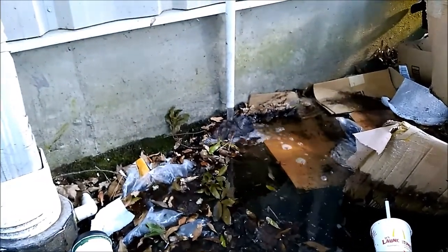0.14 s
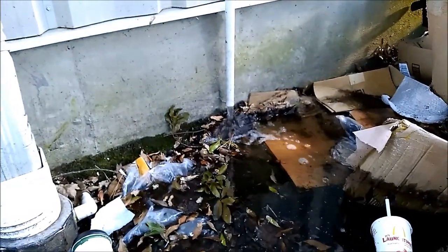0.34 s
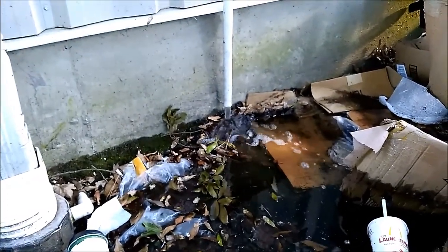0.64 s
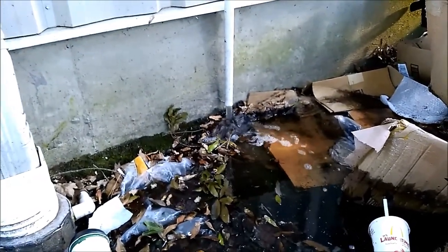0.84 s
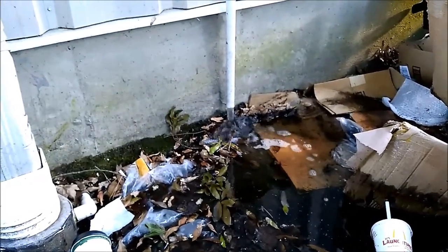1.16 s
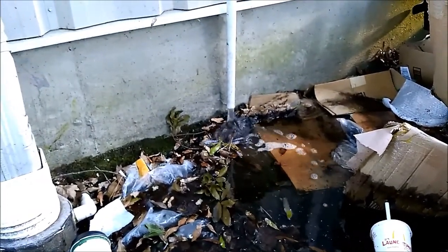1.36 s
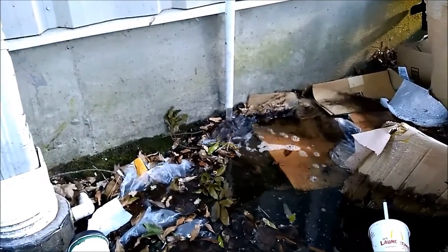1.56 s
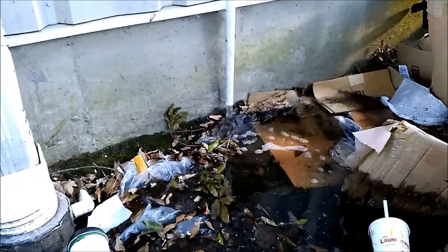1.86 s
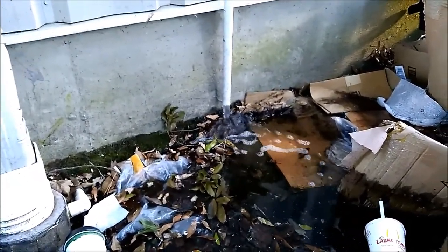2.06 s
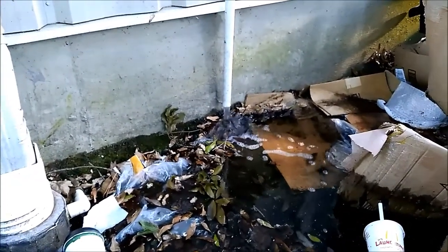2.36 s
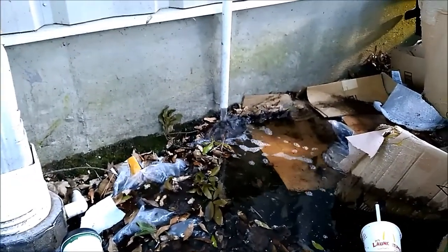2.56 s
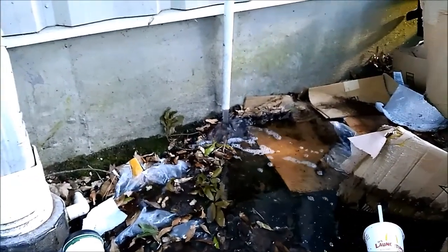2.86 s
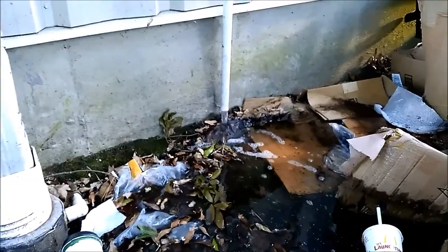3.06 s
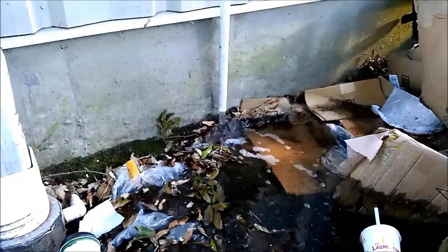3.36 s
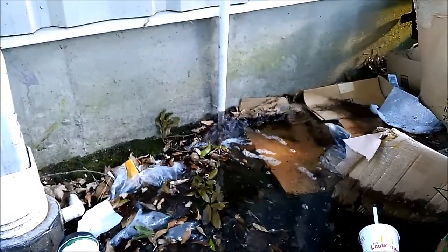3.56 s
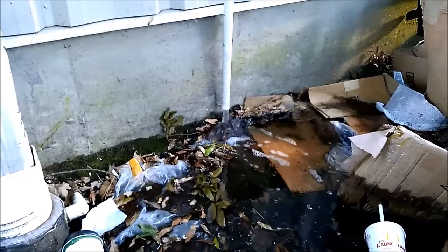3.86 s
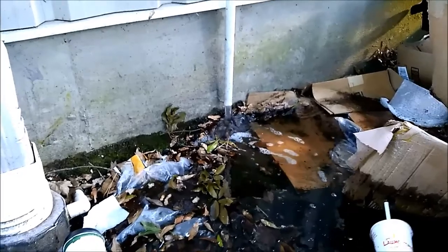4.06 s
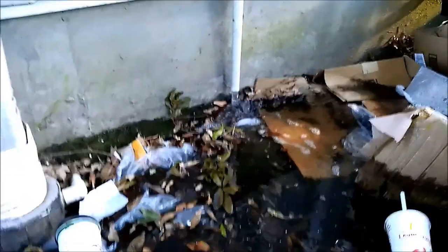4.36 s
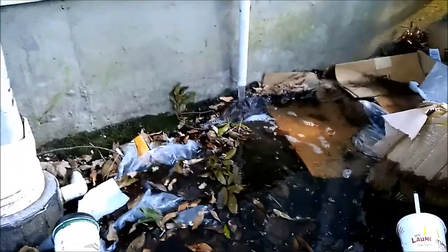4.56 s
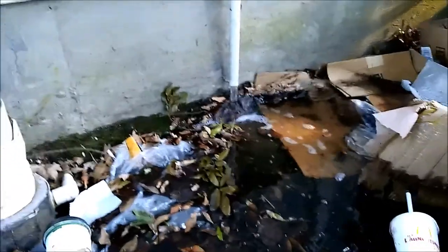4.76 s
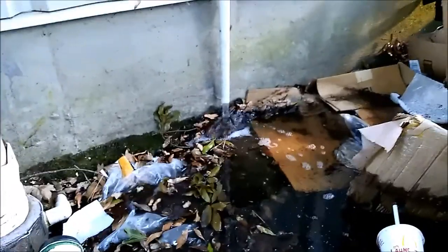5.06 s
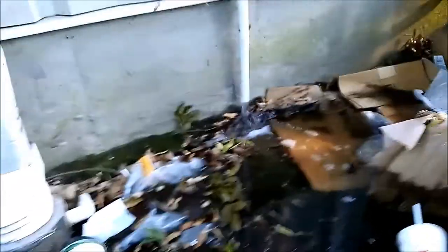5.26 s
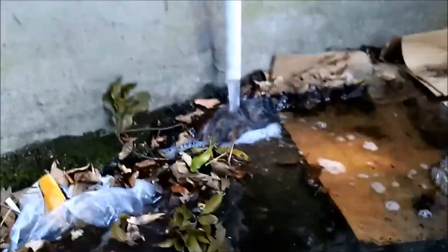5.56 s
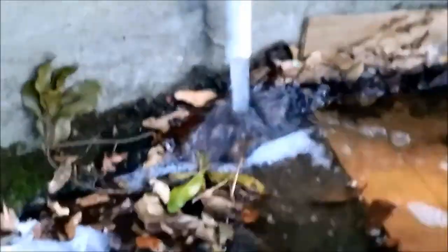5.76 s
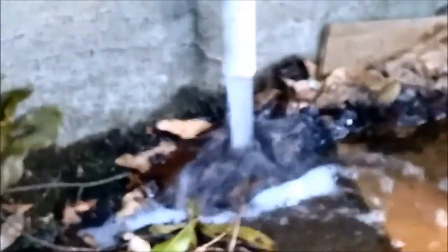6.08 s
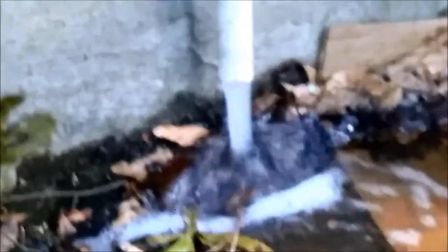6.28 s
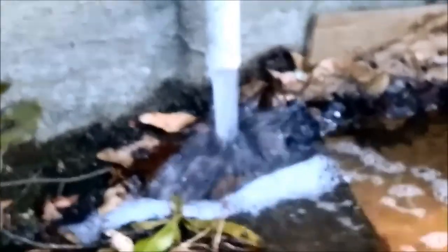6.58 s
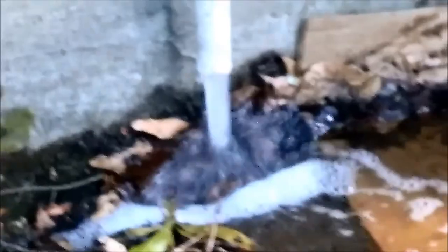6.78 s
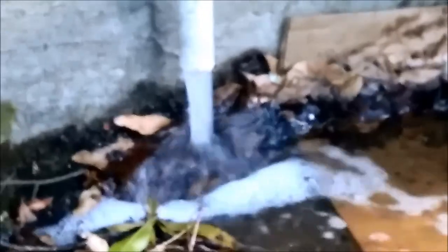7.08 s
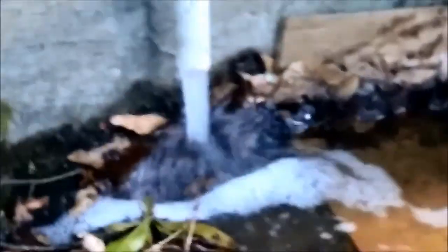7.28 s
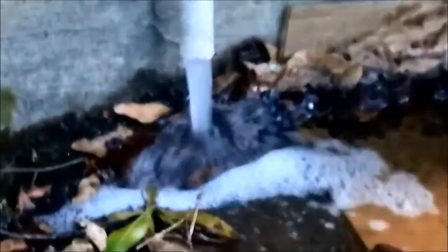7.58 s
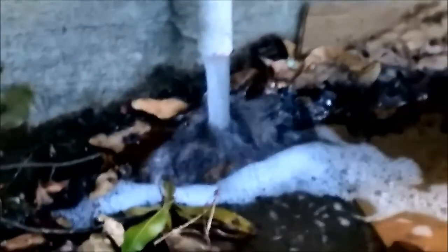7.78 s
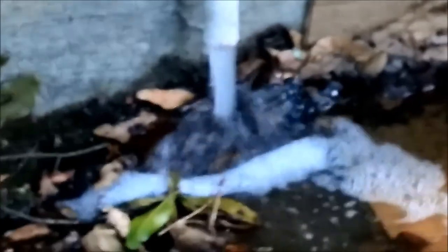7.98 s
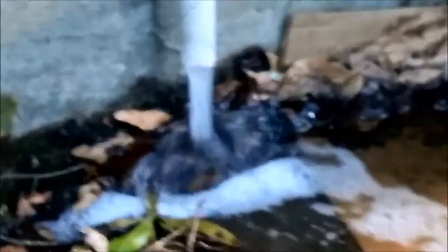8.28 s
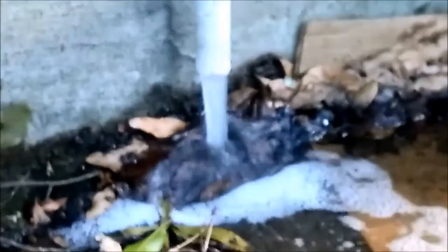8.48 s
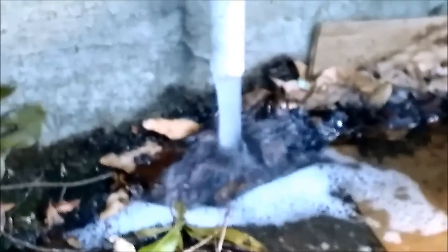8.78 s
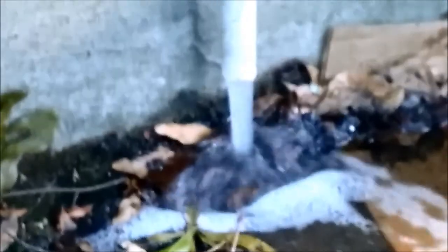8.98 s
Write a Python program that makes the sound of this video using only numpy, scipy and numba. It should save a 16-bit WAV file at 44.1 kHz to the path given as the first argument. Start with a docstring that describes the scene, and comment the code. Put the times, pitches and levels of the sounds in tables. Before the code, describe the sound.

Outdoors, water pours from a drain pipe into a puddle a few metres from a hand-held phone. It hisses in countless small splashes, bubbles, and ticks on wet leaves and cardboard over a low, uneven rumble. The hand bumps the phone softly a few times. Late on, one sharp knock hits the left microphone, and that side stays louder, with a bright hiss and a faint thin whistle.

```python
"""A puddle among wet leaves under a drain pipe, a few metres from a hand-held phone's two microphones.
The falling water hisses in countless small splashes, ticks on leaves and card, and rings as bubbles,
over a low rumble that the microphones hear in opposite phase. Close up, the hand bumps the phone.
One knock lands on the left microphone, which is louder and hisses brightly from then on."""
import sys
import numpy as np
from scipy import signal
from scipy.fft import rfft, irfft, next_fast_len
from scipy.io import wavfile
from scipy.ndimage import uniform_filter1d
from numba import njit

SR = 44100
rng = np.random.default_rng(int(sys.argv[2]) if len(sys.argv) > 2 else 0)


def wav_out(sig):
    """Save sig, one row per channel (or a flat mono array), as 16-bit PCM at SR to the path in sys.argv[1]."""
    wavfile.write(sys.argv[1], SR, np.round(np.clip(np.atleast_2d(sig).T, -1, 1) * 32767).astype(np.int16))


N = 402632
KNOCK_S = 7.1847
GURGLE, SPRAY = 2, 3  # rows of the flow

# centres of the four parts of the wash (rumble, rush, gurgle, spray): f/Hz
PART_HZ = [150, 900, 2600, 5600]
# slow swell of the flow: t/s, rumble/dB, rush/dB, gurgle/dB, spray/dB
FLOW = [(0, 3, 1, .5, -1), (.6, 4.5, 2, .5, -1.45), (1.15, 7.5, -1, 0, 2), (1.4, 4.5, 0.5, -1.5, 1),
        (1.85, 5.5, 1.5, .5, 0), (2.2, 0, -1.5, 2.5, -2), (2.62, 6.5, 1.5, 0, -1.5),
        (2.74, -6.5, -6, -3, -2), (3.1, 3.5, -1, 0, -2.5), (3.3, -4.5, -5, -1, -2),
        (3.5, -8, -11.5, -7.5, -2.5), (4.33, -8.5, -9, -6, -4), (4.7, -13.5, -9, -6, -3),
        (5.2, -1, -1.5, -4, -4.5), (5.5, -10.5, -7, -11, -3), (5.85, -9, -7, -8.5, -3),
        (6.0, -13.5, -6.5, -11.5, -4), (6.38, -10.5, -8, -12, -1.5), (6.5, -10.5, -1.5, -5.5, 0),
        (6.85, -1, -0.5, -1, -2), (7.1, -13, 0, -9, -2.5), (7.4, -7.5, -4.5, -9, -8),
        (8.25, -9.5, -3.5, -8, -8), (8.4, -0.5, -3.5, -7, -14), (8.6, -7, -3.5, -7, -10.5),
        (9.13, -5.5, -2, -7, -12)]
# gushes on top of the flow: t/s, length/s, rumble/dB, rush/dB, gurgle/dB, spray/dB
GUSHES = [(.8, .2, 3, -1, 2, 2), (2.421, .22, -6.5, -1, 0.5, 2), (3.781, .16, 2, 2, 7, 3),
          (3.931, .1, 4, 0, 6, 1), (4.03, .12, 4, 8.5, 4, 3.5), (4.419, .14, 6, 6, 10, 7),
          (4.53, .14, 8, 4.5, 9, 5), (4.899, .17, 3.5, -1.5, 10, 1.5), (5.07, .14, -10, -3.5, 4.5, 1),
          (5.28, .1, -2, -1.5, 5, 2), (5.69, .15, 4, 1, 7, 3), (7.521, .1, -7, 1, 4, 1.5),
          (8.13, .16, 8.5, 2, 5, 2), (8.78, .2, -4, -0.5, 4, 1)]
# base spectrum of the wash at the right microphone: f/Hz, level/dB
WASH_SPECTRUM = [(30, -68.5), (60, -63.5), (130, -71.5), (250, -74.5), (450, -83), (1000, -80.5),
                 (1700, -87.5), (2400, -89.5), (3300, -90), (4800, -89.5), (6800, -90), (9600, -83.5),
                 (11500, -93.5), (15500, -101.4)]
# left microphone over right: f/Hz, level/dB
LEFT_OVER_RIGHT = [(60, 1), (200, 3.0), (600, 5), (1300, 1), (2000, -2), (2700, -3), (3600, -1),
                   (4800, -2.5), (6000, 2.5), (7500, 3.5), (9500, 3), (12000, 7), (15000, 6.5)]
# likeness of the wash at the two microphones: f/Hz, correlation (-1..1)
CORRELATION = [(60, -0.93), (130, -0.84), (290, -0.81), (640, -0.55), (1410, 0.2), (3100, -0.21),
               (6820, 0.51), (15000, -0.2)]
# gain of the wash's bands above 11 kHz: t/s, level/dB
TOP_GAIN = [(0, 1), (4.2, 1.5), (5.3, -2.5), (7, -10.5), (9.13, 10)]
# gain of the rumble's bands below 110 Hz: t/s, level/dB
DEEP_GAIN = [(0, -0.5), (.7, -7.5), (2.3, -4), (3.5, 1.5), (6.5, 7.5), (7.3, 3.5), (9.13, 1.5)]
# drift of the rumble at the left microphone: t/s, level/dB
RUMBLE_LEFT = [(0, 3), (2, 1.5), (2.6, 1), (3.4, -1.5), (6.4, -1), (7, 0.5), (9.13, 0)]
# lift of the wash at the left microphone after the knock: f/Hz, level/dB
LEFT_LIFT = [(200, 5), (600, 5.5), (1000, 5.5), (1600, 11.5), (2100, 2), (2700, 13), (9500, 5.5),
             (15000, 1)]
# hand on the phone: t/s, level/dB, f/Hz, length/s, signed weight of the right microphone
HAND_BUMPS = [(3.033, -34, 120, 0.046, -0.54), (3.04, -39.5, 269, 0.031, -0.43),
              (3.046, -42, 755, 0.028, -0.38), (5.18, -32, 189, 0.022, -0.7),
              (5.193, -33.5, 875, 0.012, -0.17), (5.198, -30, 750, 0.0051, 0.11),
              (5.2, -28, 220, 0.019, -.3), (5.216, -39, 174, 0.077, -0.49), (6.462, -33, 97, 0.062, -0.55),
              (6.738, -29.5, 154, 0.043, -0.6)]
# modes of case and membrane: f/Hz, level/dB, t60/s, signed weight, cycles gained as the pitch sags
KNOCK_MODES = [(68, 7, 0.07, -0.64, 0.44), (259, -7.5, 0.043, -0.97, 0.14), (339, 3, 0.0317, -0.67, 0.0039),
               (607, 10.5, 0.03, 0.25, 0), (1060, -6, 0.023, -1.1, 0.024), (1570, -29, 0.02, 0.42, 0),
               (2280, -26, 0.032, 0.59, 0.028)]
# clicks of the case just after the knock: t/s, level/dB, f/Hz, left minus right/dB
CASE_RATTLE = [(7.2004, -27.5, 7450, 29), (7.2006, -41, 1900, 30), (7.1865, -32.5, 2270, 26),
               (7.1895, -37, 1980, 24), (7.194, -40, 1500, 25), (7.2006, -27, 5600, 28),
               (7.2018, -37.5, 4150, 30), (7.2035, -42, 4030, 30)]
# spectral shape of the hiss at the left microphone: f/Hz, level/dB
HISS_SPECTRUM = [(1760, -66), (3000, -14), (3200, -21), (3860, 3.5), (4840, 8.5), (5980, 8.5), (8480, -5.5),
                 (9000, -4), (11700, -42), (19800, -120)]
# course of that hiss: t/s, lower band/dB, upper band/dB
HISS_LEVELS = [(7.22, -49, -41), (7.44, -44, -41), (8.19, -43.5, -42.5), (8.26, -45, -49),
               (8.5, -44.5, -48), (8.8, -44, -46), (9.13, -44, -47.5)]
# thin tone in the hiss: t/s, level/dB, f/Hz
WHISTLE = [(7.25, -56, 4940), (7.33, -48, 4960), (7.5, -46, 4985), (7.72, -47, 4985), (7.85, -51, 4985),
           (8.1, -53, 4990), (8.6, -58, 4960), (8.7, -45, 4945), (9.0, -45, 4940), (9.13, -45, 4945)]
# bright spurts of spray: t/s, level/dB, length/s
SPURTS = [(0.823, -42.5, 0.18), (1.386, -38.5, 0.21)]
# drops on leaves and card: t/s, level/dB, f/Hz, left minus right/dB
LEAF_TICKS = [(0.054, -30, 8300, 7.5), (0.1406, -27.5, 8500, 10.5), (0.1645, -34, 9890, 3.0),
              (0.188, -26, 8930, 6), (0.4444, -32, 8820, 6), (0.5861, -27.5, 8900, 9),
              (0.6195, -34, 10200, 4), (0.7243, -40, 9510, 4.0), (0.7354, -35, 10400, 7),
              (1.0974, -31, 9100, 8), (1.1244, -35, 10400, 4.0), (1.2526, -26.5, 9700, 3),
              (1.5893, -29, 8820, 9), (1.8312, -32, 6270, 3), (2.0807, -34, 8990, 2.0),
              (2.1395, -28, 9000, 6), (2.151, -32, 9400, 6), (2.2109, -35, 8670, 7),
              (2.2314, -36, 11500, 4.5), (2.3795, -33, 6250, 2.0), (2.5042, -27.5, 9500, 6),
              (2.5654, -38, 10200, 4.0), (2.642, -40, 10100, 2), (2.7795, -32, 6560, 4),
              (2.802, -25, 8550, 4), (2.8547, -26, 7200, 7.5), (3.1594, -33, 9000, 7),
              (3.192, -28, 9800, 2), (3.2166, -23.5, 7750, 7), (3.316, -35, 7500, 8),
              (3.32, -27.5, 8500, 7), (3.38, -37, 8490, 9), (3.4359, -29.5, 10200, 9),
              (3.7628, -38, 8170, 8), (3.8054, -38, 10600, 3.0), (3.822, -34, 8900, 6),
              (3.8437, -31.5, 8670, 8), (3.8884, -33, 11900, 4.0), (4.0204, -32, 8400, 6),
              (4.0454, -31, 8200, 7), (4.0532, -32, 6150, -4), (4.0822, -30, 6040, 6.5),
              (4.0864, -32, 5700, -3), (4.1614, -32, 8100, 6.5), (4.375, -39, 9600, 1),
              (4.439, -46, 4660, -2), (4.456, -37, 8300, 6), (4.4752, -31, 7100, 12), (4.485, -27, 9000, 3),
              (4.5014, -28, 9200, 6), (4.5184, -35, 9970, 6), (4.5416, -28.5, 9200, 5),
              (4.561, -31, 7900, 7), (4.6184, -39, 10000, 5.0), (4.6254, -33, 9300, 3.0),
              (4.9871, -30, 7050, 7), (5.0873, -34, 9200, -1), (5.3, -34, 8750, 9), (5.3124, -39, 9740, -1),
              (5.33, -41, 9530, 3.0), (5.524, -42, 10100, 3.0), (5.5488, -42, 8900, 1.0),
              (5.7187, -23, 8300, 3.5), (5.7319, -27.5, 9140, 8), (6.2406, -32, 9500, 9),
              (6.277, -40, 12400, 6), (6.2914, -36, 8000, 13), (6.4145, -42, 8280, 10),
              (6.4423, -34.5, 8600, 21), (6.4652, -28, 8800, 2.0), (6.501, -33.5, 5080, 1),
              (6.5604, -37, 8250, 6), (6.6602, -31.5, 7890, 10.5), (6.797, -34, 8600, 6),
              (6.8194, -33, 8220, 8), (6.9824, -45, 9180, 1.0), (7.012, -47, 8100, 1),
              (7.075, -38, 8400, 14), (7.1587, -33, 7440, 9), (7.7807, -29.5, 7460, 11),
              (8.1644, -37, 5770, 14), (8.3536, -45, 6900, 11.5), (8.8313, -35, 5760, 12),
              (1.9809, -28, 11300, 7), (2.519, -31, 9000, 9), (4.4795, -28, 8500, 8),
              (4.4865, -30, 6100, -6), (6.3105, -38, 8100, 12), (6.3245, -35, 8500, 8),
              (6.419, -35, 8200, 16), (6.478, -34, 7900, 10), (6.5985, -37, 9000, 8),
              (7.553, -37, 7940, 12), (7.843, -35, 7500, 13)]
# bubbles in the puddle: t/s, level/dB, f/Hz, left minus right/dB
BUBBLES = [(.102, -40, 2240, -13), (.1715, -37.5, 3570, -9), (.299, -37, 1030, 13),
           (.4229, -37.5, 3450, .5), (.5407, -35.5, 3170, -1.5), (.644, -43, 4230, 10),
           (.8604, -37, 2380, -5), (1.034, -38, 3570, -2), (1.053, -42, 2160, 3), (1.2418, -38, 2300, -12),
           (1.6967, -34.5, 2090, 2), (1.8337, -34, 3500, -2), (1.944, -35.5, 2010, -2),
           (2.0023, -38, 2080, 3), (2.17, -39, 2220, -3), (2.3166, -36, 3660, -5), (2.5426, -35, 3230, -5),
           (2.6383, -37, 2130, -1), (2.824, -43.5, 2320, -20), (2.9246, -37, 2210, -7),
           (3.1196, -39, 1020, 10), (3.2203, -34, 2300, -11), (3.8126, -33, 3390, -3),
           (3.909, -41.5, 2240, -7), (3.957, -39.5, 2100, -6), (4.0633, -44, 1470, -16),
           (4.413, -42, 2520, -13), (4.4398, -40, 4170, -12), (4.4662, -37, 2000, 0),
           (4.5506, -39.5, 3270, -5), (4.7646, -40, 1190, -5), (4.9028, -40.5, 2970, -7),
           (4.9586, -43, 2060, -1), (4.995, -38, 2080, 5), (5.0864, -44, 1210, -4),
           (5.1272, -40, 3130, -4.5), (5.1771, -40, 3900, -11), (5.3448, -41.5, 2790, -9),
           (5.5953, -45, 1700, -12), (5.7274, -48, 2460, -18), (8.3532, -29, 5060, 15),
           (8.355, -38, 3800, 12), (.376, -40, 2240, 0), (3.2205, -38, 4000, -2), (3.334, -39, 5400, 0),
           (4.547, -38, 5800, 0), (4.562, -41, 2900, -3), (4.6, -44, 5700, 0), (4.447, -39, 4200, -7),
           (.394, -34, 5500, 3), (2.929, -36.5, 3470, -3), (4.528, -42, 3450, -4), (5.087, -44, 2200, -4),
           (5.088, -37, 3200, -4), (5.183, -42, 2330, -6), (5.295, -45.5, 2250, -6), (5.464, -38, 5600, 8),
           (5.466, -36, 4670, -4), (5.604, -37, 4600, -4), (7.484, -45, 3100, 8), (7.815, -42, 3400, 12),
           (7.832, -48, 3300, 10), (7.84, -49, 2950, 8), (7.88, -41, 3700, 12)]


def undb(db):
    return 10 ** (np.asarray(db) / 20)


def curve(table, column=1):
    """A column of a table over time, at every sample."""
    rows = np.array(table, float)
    return np.interp(np.arange(N) / SR, rows[:, 0], rows[:, column])


def over_hz(table, hz):
    """A table read on a log-frequency axis."""
    rows = np.array(table, float)
    return np.interp(np.log(np.maximum(hz, 1)), np.log(rows[:, 0]), rows[:, 1])


def walk(per_s):
    """Random levels held 1 / per_s seconds and smoothed twice; spread near 1."""
    hold = int(SR / per_s)
    steps = np.repeat(rng.standard_normal(N // hold + 1), hold)
    return 1.3 * uniform_filter1d(uniform_filter1d(steps, hold), hold)[:N]


def butter(x, order, hz, kind):
    return signal.sosfilt(signal.butter(order, hz, kind, fs=SR, output="sos"), x)


def noise_band(edges_hz, shape=N):
    """Band of noise at unit rms."""
    band = butter(rng.standard_normal(shape), 1, edges_hz, "bandpass")
    return band / band.std()


def arch(start_s, length_s):
    """Half-sine swell."""
    return np.sin(np.pi * np.clip((np.arange(N) / SR - start_s) / length_s, 0, 1))


@njit
def rings(noise, start, hz, cycles, glide, gain, rough):
    """Short rings: quick rise, 1 / e fall in the given cycles, gliding pitch, phase shaken by noise."""
    out = np.zeros((2, len(noise)))
    for g in range(len(hz)):
        tau = cycles[g] * SR / hz[g]
        phase = 0.
        for i in range(min(int(6 * tau), len(noise) - start[g] - 4)):
            phase += 2 * np.pi * hz[g] / SR * (1 + glide[g] * i / tau + rough * noise[start[g] + i])
            ring = 1.8 * np.sin(phase) * (np.exp(-i / tau) - np.exp(-5 * i / tau))
            out[0, start[g] + i + 3] += gain[0, g] * ring  # reaches the left microphone later
            out[1, start[g] + i] += gain[1, g] * ring
    return out


def scattered_rings(flow_db, count, span_hz, cycles, glide, rough, db, spread_db, bunch_db, left_gain):
    """Random rings that come in bunches, denser and louder as the flow swells."""
    when, pitch, size, side, length = rng.random((count, 5)).T
    arrivals = np.cumsum(undb(bunch_db * walk(30) + 1.2 * flow_db))
    start = np.minimum(np.searchsorted(arrivals, when * arrivals[-1]), N - 1)
    low_hz, high_hz = span_hz
    hz = low_hz * (high_hz / low_hz) ** pitch
    size_db = np.minimum(-spread_db * np.log(1 - size), 3 * spread_db)
    level_db = db + over_hz(WASH_SPECTRUM, hz) + .5 * flow_db[start] + size_db
    pan_db = 6 * (side - .5)
    gain = undb([level_db + over_hz(LEFT_OVER_RIGHT, hz) + pan_db, level_db - pan_db])
    gain[0] *= left_gain
    return rings(rng.standard_normal(N), start, hz, cycles * (.5 + length), glide * length, gain, rough)


def listed_rings(table, cycles, rough, glide=0, db=0, pitch_ratio=1, ring_s=0):
    """One ring per row, lasting some cycles plus a fixed time; length and glide vary at random."""
    s, level_db, hz, pan_db = np.transpose(table)
    stretch, bend = 1 + .57 * (2 * rng.random((len(s), 2)).T - 1)
    gain = undb([level_db + db + pan_db / 2, level_db + db - pan_db / 2])
    start = (s * SR).astype(int)
    decay_cycles = (cycles + ring_s * hz) * stretch
    return rings(rng.standard_normal(N), start, pitch_ratio * hz, decay_cycles, glide * bend, gain, rough)


def pipe_flow():
    """Swell of rumble, rush, gurgle and spray in dB: slow flow, random wander, gushes."""
    t, rise_s = np.arange(N) / SR, .035
    flow = np.array([curve(FLOW, column=k) + .83 * walk(7) for k in range(1, 5)])
    for s, length, *parts_db in GUSHES:
        gush = np.interp(t - s, [0, rise_s, max(.3 * length, rise_s), length], [0, 1, 1, 0])
        flow += np.outer(parts_db, gush)
    return flow


def wash(flow, after_knock):
    """Rumble and countless small splashes: half-octave bands that swell with the flow."""
    size = next_fast_len(N)
    hz = np.arange(size // 2 + 1) * SR / size
    alike = over_hz(CORRELATION, hz)
    mid, side = (rfft(rng.standard_normal(size)) * np.sqrt((1 + s * alike) / 2) for s in (1, -1))
    colour = undb(over_hz(WASH_SPECTRUM, hz)) * np.sqrt(SR / 2)
    pair = colour * np.array([(mid + side) * undb(over_hz(LEFT_OVER_RIGHT, hz)), mid - side])
    surge_db = 1.59 * walk(20)  # shared by the splashing bands
    top_db, deep_db, drift = curve(TOP_GAIN), curve(DEEP_GAIN), undb(curve(RUMBLE_LEFT))
    half_octaves = 2 * np.log2(np.maximum(hz, 1) / 25)
    out = np.zeros((2, N))
    for k in range(20):
        centre_hz = 25 * 2 ** (k / 2)
        band = irfft(pair * np.clip(1 - abs(half_octaves - k), 0, 1), size)[:, :N]
        shares = [np.interp(np.log(centre_hz), np.log(PART_HZ), part) for part in np.eye(4)]
        flicker_db = min(centre_hz / 1000, 1) * (surge_db + 1.3 * walk(35))  # the rumble stays even
        edge_db = top_db * (centre_hz > 11000) + deep_db * (centre_hz < 110)
        band[0] *= drift if centre_hz < 400 else 1
        band[0] *= undb(over_hz(LEFT_LIFT, centre_hz) * after_knock)
        out += band * undb(np.dot(shares, flow) + flicker_db + edge_db)
    return out


def hand_bumps():
    """Dull thuds of the hand through the case, ring and noise, mostly opposite in the two microphones."""
    t, out, ring_share = np.arange(N) / SR, 0, .82
    for s, db, hz, length, right in HAND_BUMPS:
        ring = np.sin(2 * np.pi * hz * (t - s))
        thud = ring_share * ring + (1 - ring_share) * noise_band([.7 * hz, 1.6 * hz])
        out = out + np.outer([1.4, 1.43 * right], undb(db) * thud * arch(s, length))
    return out


def knock():
    """A blow on the left microphone rings case and membrane; the lowest ring starts sharp and sags."""
    t = np.maximum(np.arange(N) / SR - KNOCK_S, 0)
    contact = 1 - np.exp(-t / .00039)
    sag = 1 - np.exp(-t / .003)
    return contact * sum(weight * undb(db - 60 * t / t60) * np.sin(2 * np.pi * (hz * t + gained * sag))
                         for hz, db, t60, weight, gained in KNOCK_MODES)


def microphone_hiss():
    """Bright noise in the left microphone's opening, its upper band fading first, with a thin tone."""
    size = next_fast_len(N)
    hz = np.arange(size // 2 + 1) * SR / size
    spectrum = rfft(rng.standard_normal(size)) * undb(over_hz(HISS_SPECTRUM, hz))
    upper = np.clip((hz - 5200) / 600 + .5, 0, 1)
    low, high = (irfft(spectrum * share, size)[:N] for share in (1 - upper, upper))
    air = low / low.std() * undb(curve(HISS_LEVELS))
    air += high / high.std() * undb(curve(HISS_LEVELS, column=2))
    tone_hz = curve(WHISTLE, column=2) * (1 + .0015 * walk(40))
    tone = np.sin(2 * np.pi * np.cumsum(tone_hz) / SR)
    return air * undb(.7 * walk(40)) + tone * undb(curve(WHISTLE) - 1 + 2.5 * walk(45))


def squeak(start_s=4.975, length_s=.082, rise_s=.0071, climb_hz_per_s=1600):
    """A short thin tone, just left of centre, that climbs and wavers fast."""
    t = np.arange(N) / SR - start_s
    gate = np.clip(t / rise_s, 0, 1) * (t < length_s)
    hz = (7060 + climb_hz_per_s * np.clip(t, 0, length_s)) * (1 + .04 * walk(900))
    tone = np.sin(2 * np.pi * np.cumsum(hz) / SR)
    return gate * undb(-42.5 + 2.2 * walk(460)) * tone * undb([[1], [-1]])


def spurts():
    """Fine spray, left of centre, that swells and dies in a moment."""
    bright, low, airy = (noise_band(hz, (2, N)) for hz in ((9400, 10100), (4700, 5370), (11600, 15000)))
    swell = sum(undb(db) * arch(s, length) for s, db, length in SPURTS)
    return (bright + undb(-8) * low + undb(-10) * airy) * swell * undb([[2.5], [-1.5]])


def splash(flow, after_knock):
    """Water hits the puddle: bright spatter and patter in phase, gurgle and lumps in opposite phase."""
    spatter = scattered_rings(flow[SPRAY], 4000, (4434, 11860), cycles=6.9, glide=0, rough=.27,
                              db=39.5, spread_db=3, bunch_db=7, left_gain=.99)
    gurgle = scattered_rings(flow[GURGLE], 2800, (1822, 6090), cycles=23.7, glide=.0383, rough=.21,
                             db=31.5, spread_db=3.5, bunch_db=2.5, left_gain=-1.06)
    patter = scattered_rings(flow[SPRAY], 400, (6500, 12200), cycles=4.1, glide=0, rough=.36,
                             db=35.5, spread_db=5.5, bunch_db=4.5, left_gain=.88)
    lumps = scattered_rings(flow[GURGLE], 900, (1484, 6080), cycles=6.3, glide=.034, rough=.46,
                            db=36, spread_db=4, bunch_db=2.5, left_gain=-.86)
    fine_drops = spatter + gurgle + patter
    fine_drops[0] *= undb(5 * after_knock)  # the left microphone opens up
    return fine_drops + lumps


def leaf_ticks():
    """Drops strike leaves and card: a sharp tick, a short tail and a lower ring that widens it."""
    tick = listed_rings(LEAF_TICKS, cycles=4.9, rough=.16, db=3.5)
    tail = listed_rings(LEAF_TICKS, cycles=27, rough=.21, db=-5)
    under = listed_rings(LEAF_TICKS, cycles=7.7, rough=.51, db=-11, pitch_ratio=.84)
    return butter(tick + tail + under, 2, 3950, "highpass")


def bubbles():
    """Each bubble rings with rising pitch, opened by the short splat of the drop that made it."""
    ring = listed_rings(BUBBLES, cycles=2.5, rough=.36, glide=.015, ring_s=.0016)
    splat = listed_rings(BUBBLES, cycles=3.8, rough=.7, db=-9, pitch_ratio=1.59)
    return ring + splat


def scene():
    """The water a few metres off and the handling right at the microphones, as left and right."""
    flow = pipe_flow()
    after_knock = np.clip((np.arange(N) / SR - KNOCK_S) / .0027, 0, 1)
    drops = splash(flow, after_knock) + leaf_ticks() + bubbles()
    drops = butter(drops, 2, 13000, "lowpass")  # the microphone openings roll off
    rattle = listed_rings(CASE_RATTLE, cycles=3, rough=.2, glide=-.05)
    handling = hand_bumps() + rattle
    handling[0] += knock() + after_knock * microphone_hiss()
    return wash(flow, after_knock) + drops + spurts() + squeak() + handling


def record(dry):
    """The phone clips the peaks, loses the deepest bass and cuts the top."""
    thin = butter(np.clip(dry, -1.05, 1.05), 2, 41, "highpass")
    top_cut = signal.ellip(10, .2, 70, 15700, fs=SR, output="sos")
    return signal.sosfilt(top_cut, np.clip(thin, -.97, .97))


dry = scene()
out = record(dry)
wav_out(out)
```